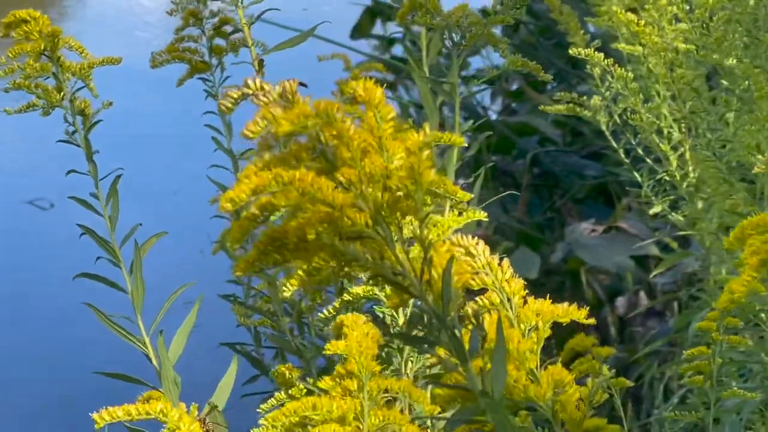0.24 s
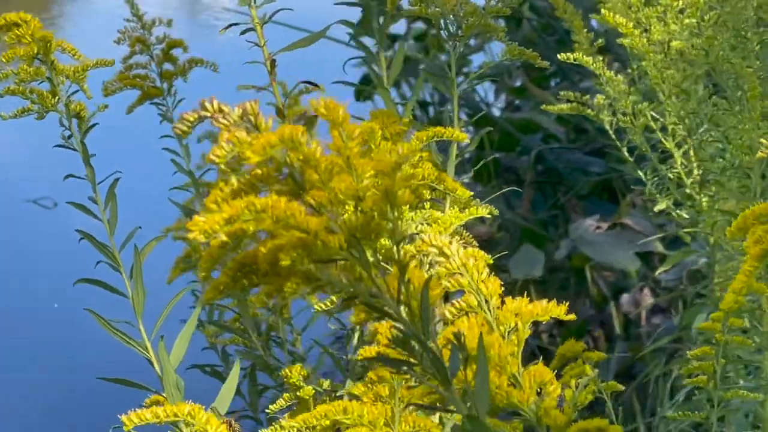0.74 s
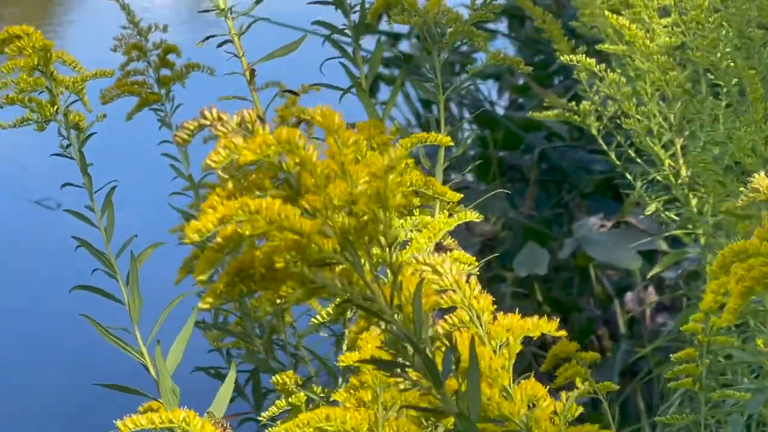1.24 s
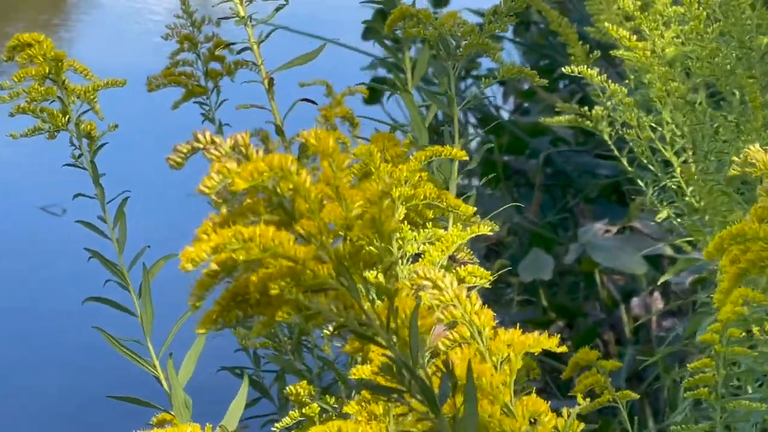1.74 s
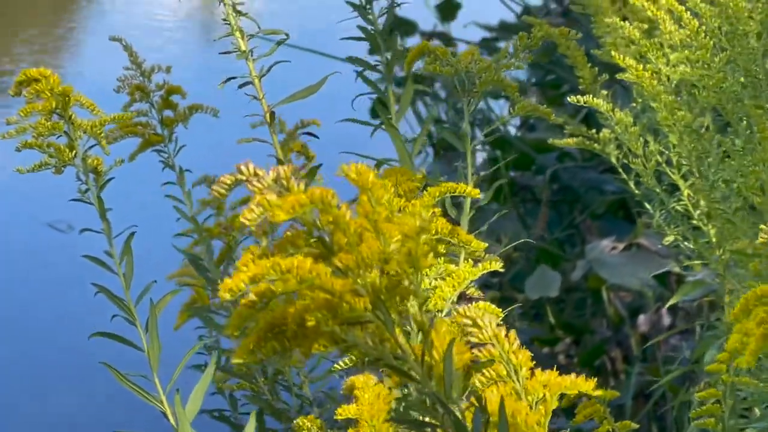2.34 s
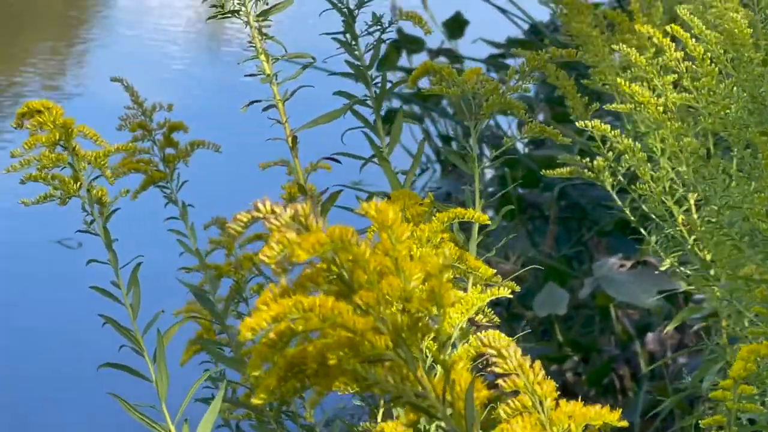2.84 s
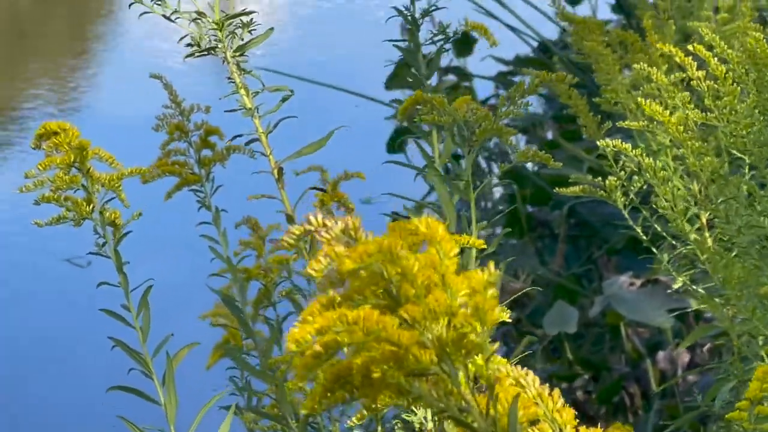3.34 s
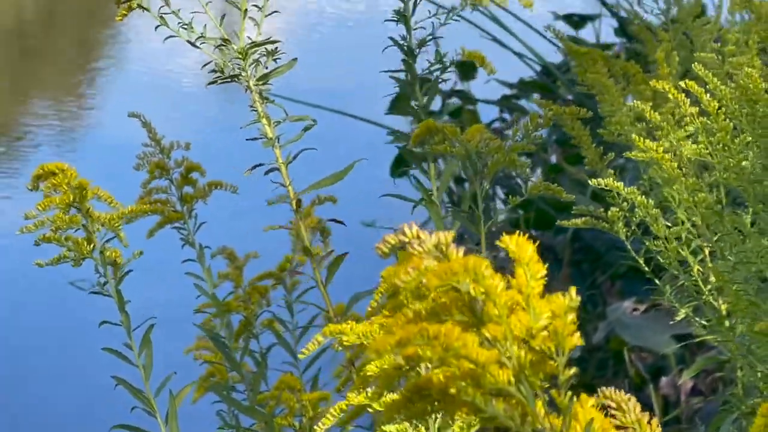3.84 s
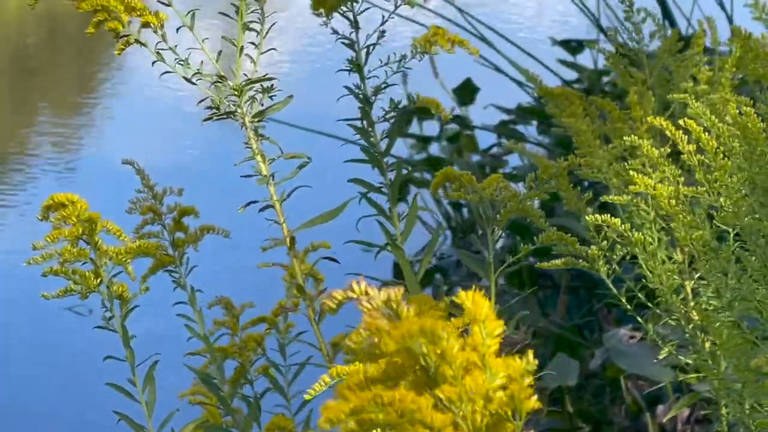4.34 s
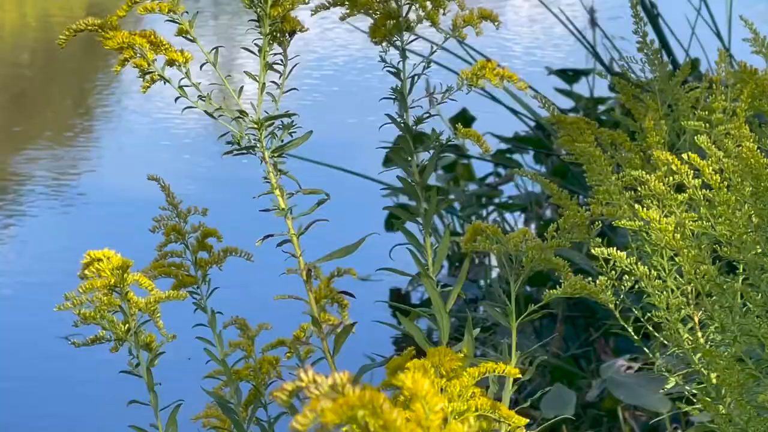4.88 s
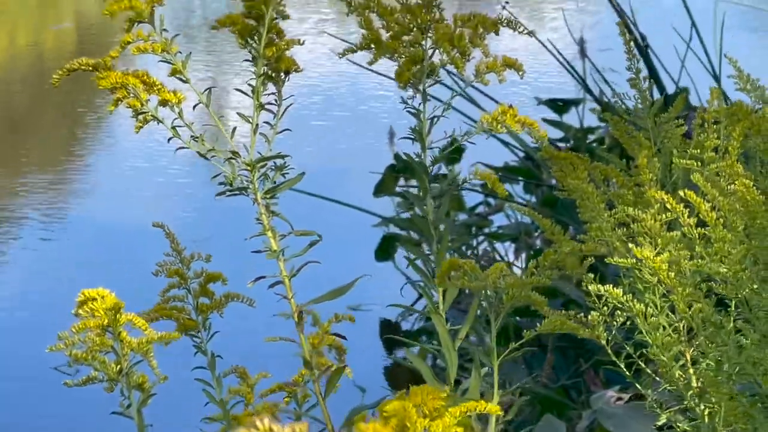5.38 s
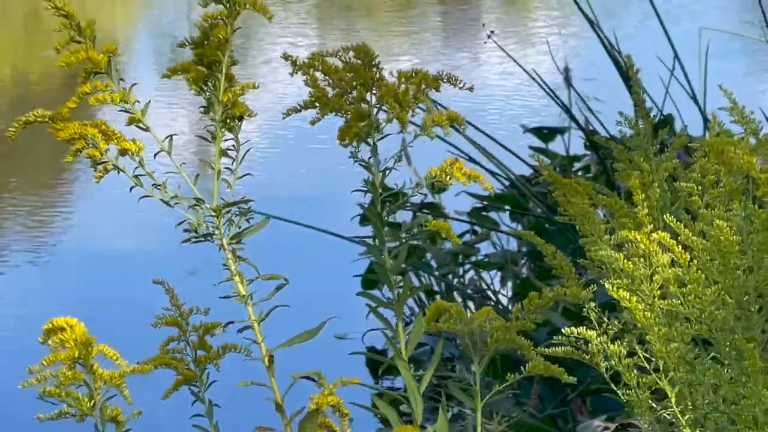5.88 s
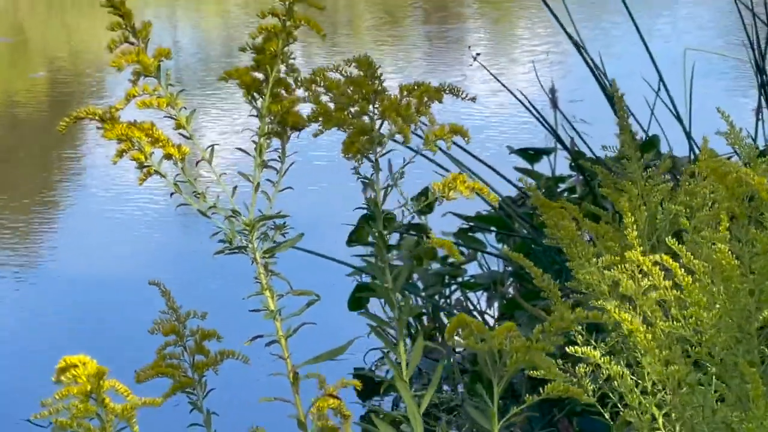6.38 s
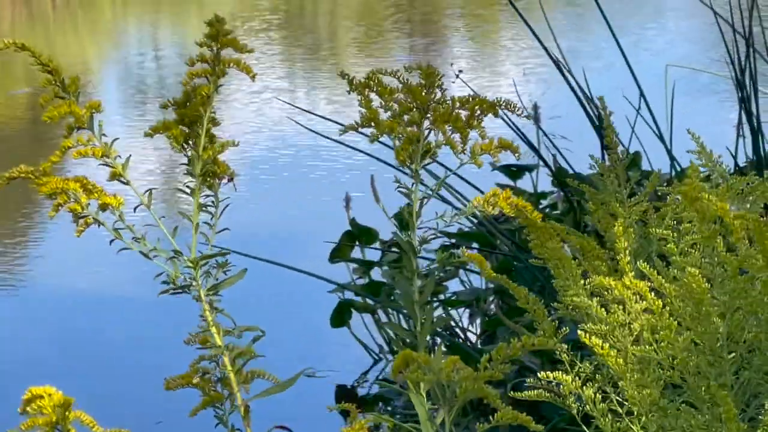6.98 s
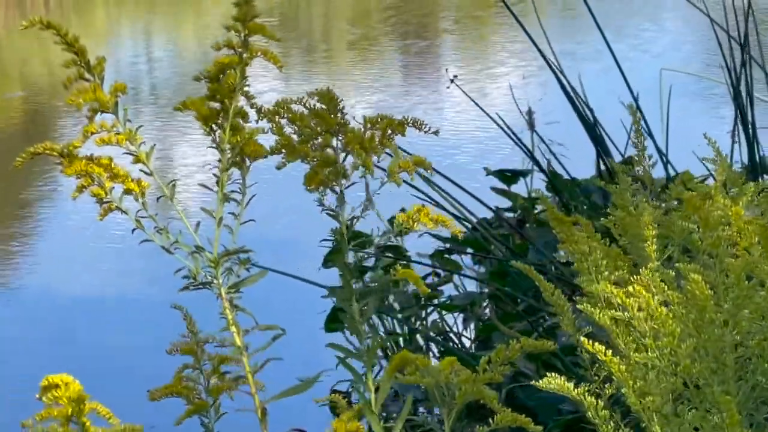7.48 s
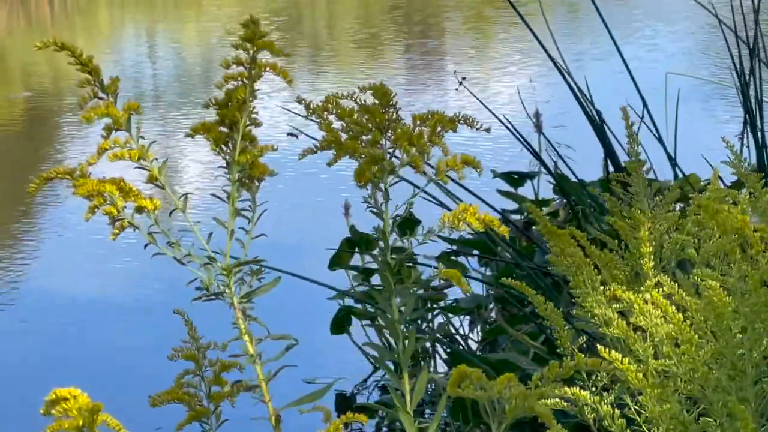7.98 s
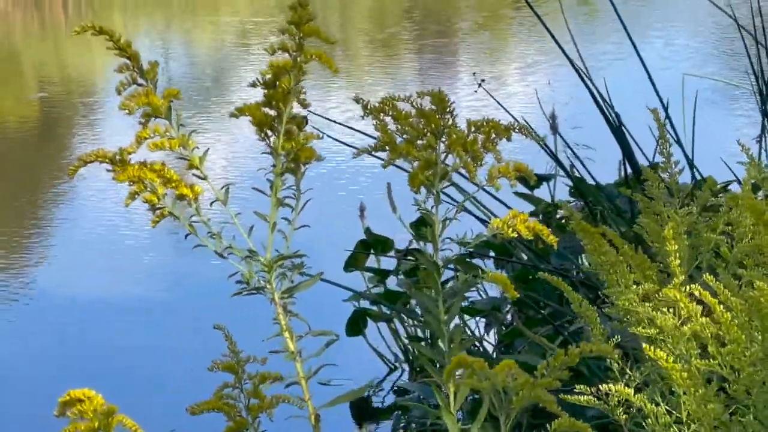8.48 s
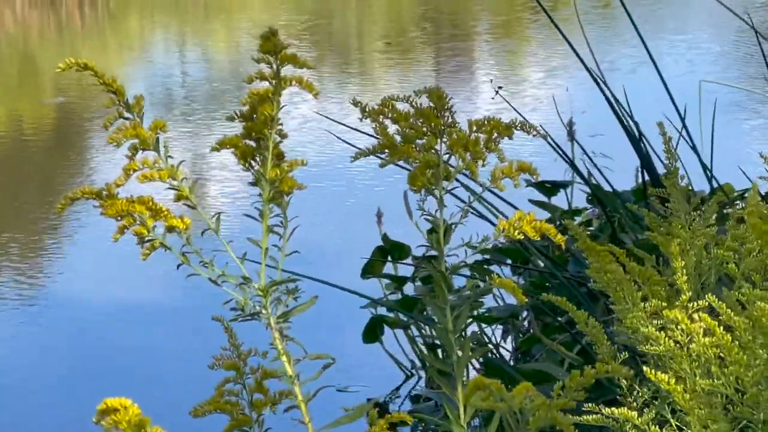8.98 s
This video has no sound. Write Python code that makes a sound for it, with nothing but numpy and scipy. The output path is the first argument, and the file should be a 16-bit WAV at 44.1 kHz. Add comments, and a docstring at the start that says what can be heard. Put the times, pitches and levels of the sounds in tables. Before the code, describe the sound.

A constant shimmering insect chorus by a pond, fast trills and fizzing katydid rasp, with low thudding wind gusts, a few tiny knocks and soft air.

```python
"""Two ground crickets trill in two gears on a weedy pond bank, over a faint distant trill and a far blur.
Two slower crickets pulse in and out of step; each cricket stroke near enough to stand out is a gliding tone.
Meadow katydids buzz in the top octave as noise that swells with each wing stroke, before a steady chorus.
Puffs of wind, made of shaped noise, buffet the microphone over a soft outdoor hush, with a few small
knocks and faint, wavering far-off tones."""
import sys
import numpy as np
from scipy import signal
from scipy.fft import rfft, irfft, next_fast_len
from scipy.io import wavfile
from scipy.ndimage import map_coordinates

SR = 44100
rng = np.random.default_rng(int(sys.argv[2]) if len(sys.argv) > 2 else 0)


def pcm_store(signal):
    """Save signal as 16-bit PCM."""
    levels = np.round(np.clip(np.atleast_2d(signal), -1, 1) * 32767)
    wavfile.write(sys.argv[1], SR, levels.astype(np.int16).T)


N = 406602

# Eddies that strike the microphone. Each row: start in seconds, thud peak in dB, flutter peak in dB.
EDDY_STRIKES = [(.862, -39, -52), (1.182, -43.5, -51), (1.354, -34.5, -44), (1.54, -35, -55),
                (1.633, -39.5, -52), (1.718, -35, -35.5), (1.89, -31, -45), (1.922, -34, -43.5),
                (2.039, -37, -42.5), (2.082, -43, -34.5), (2.104, -32, -28), (2.181, -33, -54),
                (2.211, -37, -36.5), (2.262, -31.5, -34.5), (2.334, -31.5, -40), (2.388, -35.5, -36),
                (2.419, -39, -42), (2.47, -43, -49), (2.512, -38, -38), (2.534, -43, -33),
                (2.555, -37, -32), (2.674, -38, -41), (2.73, -46, -52), (2.856, -35, -30),
                (2.891, -27, -43), (2.952, -39, -50), (3.053, -28, -31.5), (3.078, -39, -47),
                (3.631, -41, -55.5), (6.067, -44, -62), (8.152, -35, -59), (8.404, -34, -58)]


def amp(db):
    """Decibels to gain."""
    return 10 ** (np.asarray(db) / 20)


def unit(x):
    """Scale to rms 1."""
    return x / np.sqrt(np.mean(x ** 2) + 1e-20)


def along(points, hz):
    """Read (Hz, value) points on a log frequency axis."""
    f, v = np.transpose(points)
    return np.interp(np.log(hz + 1), np.log(f + 1), v)


def colour(points, hz):
    """Gain of a (Hz, dB) spectrum that falls away steeply beyond its ends."""
    below = (hz + 1) / points[0][0]
    above = points[-1][0] / (hz + 1)
    outside = np.minimum(1, np.minimum(below, above))
    return amp(along(points, hz)) * outside ** 4


def curves(rows):
    """One value per sample for each column after the time in seconds."""
    s, *columns = np.transpose(rows)
    return [np.interp(np.arange(N) / SR, s, column) for column in columns]


def wobble(rate):
    """A smooth random curve, rate knots a second."""
    knots = rng.standard_normal(int(N * rate / SR) + 4)
    return map_coordinates(knots, [np.arange(N) * rate / SR])


def filtered(x, response):
    """Filter x with a zero-phase response of frequency."""
    m = next_fast_len(N + SR // 4)
    hz = np.fft.rfftfreq(m, 1 / SR)
    return irfft(rfft(x, m) * response(hz), m)[..., :N]


def causal(points, size=4096):
    """Minimum-phase impulse response of a (Hz, dB) spectrum, made by folding its cepstrum."""
    hz = np.fft.rfftfreq(size, 1 / SR)
    cepstrum = irfft(np.log(colour(points, hz) + 1e-4))
    cepstrum[1:size // 2] *= 2
    cepstrum[size // 2 + 1:] = 0
    return irfft(np.exp(rfft(cepstrum)))


def rush(spectrum, side_points):
    """Stereo noise whose mid has rms 1, its width set by (Hz, side against mid in dB) points."""
    def mid_side_gain(hz):
        side_gain = amp(along(side_points, hz))
        return colour(spectrum, hz) * np.array([np.ones_like(hz), side_gain])

    mid, side = filtered(rng.standard_normal((2, N)), mid_side_gain)
    return np.array([mid + side, mid - side]) / np.std(mid)


def ground_crickets():
    """Two trills, each shifting gear in its own time, over a thin distant trill and a far blur."""
    # One wing stroke, gliding down as the scraper runs along the file.
    # Each row: age in milliseconds, pitch in Hz, relative level in dB.
    near_stroke = [(0, 5580, -26), (1.5, 5420, -8.5), (3.2, 5265, -2.5), (5.4, 5185, 0), (7.1, 5090, -2.5),
                   (8.6, 4860, -8.3), (10.6, 4580, -10), (12.4, 4420, -30)]
    neighbour_stroke = [(0, 5830, -25), (2, 5720, -2), (4.5, 5590, 0), (7, 5400, -5), (9.5, 5180, -2),
                        (11.5, 5030, -8), (13.5, 4750, -24)]
    # Gear changes. Each row: time in seconds, wing strokes a second.
    near_gears = [(0, 51.6), (.8, 51.2), (.95, 65), (2, 64.6), (3.18, 63.8), (3.35, 52), (4.92, 51),
                  (5.05, 64.9), (7.65, 64.5), (7.9, 51.5), (9.22, 50.5)]
    neighbour_gears = [(0, 60), (.62, 60.3), (.8, 71), (1.4, 73), (3.08, 71), (3.3, 59.7), (6.2, 59.3),
                       (6.4, 72), (7.2, 73), (7.85, 71.5), (8.05, 59.5)]
    # Spells in which a singer skimps a stroke again and again.
    # Each row: first time in seconds, last time in seconds, spacing in seconds, drop in dB.
    near_skips = [(.91, 3.18, .0869, 12), (3.27, 3.55, .13, 15), (3.79, 3.8, .13, 16),
                  (4.95, 6.73, .0885, 9), (6.82, 7.4, .138, 4), (7.58, 7.92, .11, 4), (8.13, 8.14, .11, 9)]
    neighbour_skips = [(.8, 3.1, .083, 10), (6.4, 7.9, .083, 10)]
    # Loudness of each singer. Each row: time in seconds, level in dB.
    near_level = [(0, -63.2), (.7, -63.8), (1.05, -65.3), (2, -61.3), (2.7, -59.3), (3.4, -59.2),
                  (4, -61.6), (4.85, -62.8), (5.05, -67.3), (5.7, -65.5), (6.2, -62.8), (7, -60.5),
                  (7.5, -61.1), (8.6, -64.7), (9.22, -64.7)]
    neighbour_level = [(0, -66.5), (1, -66), (2, -64.5), (3, -64), (4, -66.5), (6.2, -69.5), (7.4, -67.8),
                       (8.2, -69)]
    far_level = [(0, -67), (2.1, -70), (3, -77), (9.22, -79)]
    # Spectrum of the far blur. Each row: frequency in Hz, relative density in dB per Hz.
    blur_spectrum = [(4330, -22), (4540, 0), (5060, -1), (5300, -.5), (5600, 1.5), (5830, -1), (5960, 1.5),
                     (6450, 0), (6660, 5), (6850, 1.5), (7350, 2.5), (7700, -5), (8500, -28)]
    far_hz = 5128
    blur_db, blur_flicker_db = -68.1, 1.2

    near = trill(near_stroke, near_gears, near_skips, wet_db=-16, port_phase=.5)
    neighbour = trill(neighbour_stroke, neighbour_gears, neighbour_skips, wet_db=-13, port_phase=1.1)

    # One distant cricket whose strokes merge into a thin, unsteady line.
    far_phase = 2 * np.pi * np.cumsum(far_hz + 15 * wobble(90)) / SR
    far = unit(amp(2.5 * wobble(60)) * np.sin(far_phase))

    # Many far crickets merge into a flickering blur.
    blur_side = [(4400, -14), (5200, -5), (5700, 1), (6200, -2), (6800, -11)]
    blur = amp(blur_db + blur_flicker_db * wobble(110)) * rush(blur_spectrum, blur_side)

    song = amp(curves(near_level)[0]) * near + amp(curves(neighbour_level)[0]) * neighbour
    return song + amp(curves(far_level)[0]) * far + blur


def trill(stroke, gears, skips, wet_db, port_phase):
    """The fast gear beats quicker and sharper; skimped strokes break the trill into short bursts."""
    slow_gear_flat = .003  # share by which the pitch drops in the slow gear
    rate, = curves(gears)
    fast = (rate - rate.min()) / np.ptp(rate)  # 0 at the slowest beat, 1 at the fastest
    starts = beats(rate * (1 + .012 * wobble(40)))
    middles = starts + .5 / rate.mean()
    stroke_db = np.zeros(len(starts))
    for first, last, spacing, drop_db in skips:
        for s in np.arange(first, last, spacing):
            nearest = np.argmin(np.abs(middles - s))
            stroke_db[nearest] = -drop_db
    tuning = 1 - slow_gear_flat * (1 - fast)
    return stridulate(stroke, starts, vary_db=.6, detune=.004, wet_db=wet_db,
                      port_phase=port_phase, tuning=tuning, stroke_db=stroke_db)


def slow_crickets():
    """Two pulsers deep in the weeds, at slightly different rates, drift in and out of step."""
    # One wing stroke of each singer. Each row: age in milliseconds, pitch in Hz, relative level in dB.
    low_stroke = [(0, 6080, -26), (3, 6120, -5), (8, 6140, -2), (13, 6200, -1), (17, 6160, 0),
                  (21, 6080, -3.5), (26, 5945, -7), (30, 5900, -28)]
    high_stroke = [(0, 6345, -25), (5, 6360, -6), (14, 6360, 0), (22, 6345, -3), (27, 6300, -9),
                   (33, 6240, -26)]
    # The high singer's pace. Each row: time in seconds, chirps a second.
    high_rate = [(0, 11.814), (6.2, 11.814), (9.22, 11.64)]
    # Loudness. Each row: time in seconds, low singer in dB, high singer in dB.
    levels = [(0, -66, -68.7), (3, -65.6, -68.5), (4, -67.5, -72.5), (5, -67.4, -70.5), (7, -66.7, -69.5),
              (8, -67.2, -70.6), (9.22, -69.3, -73)]

    low_starts = np.arange(.053, N / SR, 1 / 11.205)  # 11.205 chirps a second
    high_starts = .05 + np.append(0, beats(curves(high_rate)[0]))
    low = stridulate(low_stroke, low_starts, vary_db=.8, detune=.002,
                     wet_db=-12, port_phase=1.2, rough=.22)
    high = stridulate(high_stroke, high_starts, vary_db=1, detune=.0015,
                      wet_db=-11, port_phase=1.0, rough=.2)
    low_db, high_db = curves(levels)
    return amp(low_db) * low + amp(high_db) * high


def beats(rate):
    """Times at which a wing beating at this rate starts a stroke."""
    turns = np.cumsum(rate) / SR
    return np.flatnonzero(np.diff(np.floor(turns))) / SR


def stridulate(stroke, starts, vary_db, detune, wet_db, port_phase, rough=.07, tuning=1, stroke_db=0):
    """Each wing stroke is one gliding, scratchy tone, reaching the two ports out of phase."""
    scratch_per_s = 300  # pace at which uneven file teeth roughen a stroke
    sway_rad, sway_per_s = 2.5, 6  # swaying stems keep turning the phase of the scattered song
    ms, pitch, level = np.transpose(stroke)
    now = np.arange(N) / SR
    index = np.maximum(np.searchsorted(starts, now) - 1, 0)
    age_ms = (now - starts[index]) * 1000

    # Every stroke differs a little in loudness, tuning and the phase at which the file catches.
    size, tune, catch = rng.standard_normal((len(starts), 3)).T
    hz = np.interp(age_ms, ms, pitch) * (tuning + detune * tune[index])
    phase = 2 * np.pi * np.cumsum(hz) / SR
    phase = phase + 0.53 * catch[index] + rough * wobble(scratch_per_s)

    swell_db = np.interp(age_ms, ms, level, left=-120, right=-120)
    swell = amp(swell_db + (vary_db * size + stroke_db)[index])
    swell = unit(swell * np.exp(rough * wobble(scratch_per_s))) * np.sqrt(2)  # the tone gets rms near 1

    direct = swell * np.sin([phase + port_phase / 2, phase - port_phase / 2])
    swaying = swell * np.sin(phase + sway_rad * wobble(sway_per_s))
    return direct + amp(wet_db) * scatter(swaying)


def scatter(x):
    """A short diffuse tail from stems and leaves, different in each ear: noise decaying by band."""
    # Scatter in the weeds. Each row: frequency in Hz, time to fall by 60 dB in seconds.
    weed_decay = [(1000, 0.026), (6000, 0.19), (15000, 0.0049)]
    hz, t, z = signal.stft(rng.standard_normal((2, SR // 4)), SR, nperseg=256)
    decay = amp(-60 * t / along(weed_decay, hz)[:, None])
    tail = signal.istft(z * decay, SR, nperseg=256)[1]
    tail = tail / np.linalg.norm(tail[0])
    return signal.oaconvolve(x[None], tail, axes=1)[:, :N]


def katydids():
    """Two singers with wavering wing beats stand out of a distant chorus of steady rasping noise."""
    # Loudness. Each row: time in seconds, level in dB.
    near_level = [(0, -56), (2, -53), (3.8, -54), (4.85, -62), (5.05, -49), (6.2, -49), (8.1, -51),
                  (8.3, -66), (9.22, -66)]
    next_level = [(0, -66), (5.3, -55), (5.7, -51.5), (9.22, -51.5)]
    chorus_level = [(0, -45), (1.5, -47), (2.7, -47.5), (3.7, -48.5), (4.4, -47.5), (5.2, -44.5),
                    (6.5, -46), (8, -46.5), (8.5, -45.5), (9.22, -46.5)]
    # Wing beat before its waver. Each row: time in seconds, wing strokes a second.
    near_beat = [(0, 44), (5, 43.6), (7.4, 42.6), (8.2, 41.3)]
    next_beat = [(5.6, 38.5), (7.3, 37.2), (9.22, 38)]
    # Rasp spectra. Each row: frequency in Hz, relative density in dB per Hz.
    near_rasp = [(8000, -36), (10500, -20), (11500, -17), (12600, -12), (13300, -5.5), (13800, -.5),
                 (14700, 0), (15200, -1.5), (15900, -3)]
    next_rasp = [(8000, -36), (10500, -23), (12600, -17), (13300, -9), (13800, -4), (14700, -1.5),
                 (15300, -1), (15700, 2), (15900, 2)]
    chorus_rasp = [(6500, -45), (7500, -25), (8200, -25), (8800, -38), (9400, -25), (10200, -16),
                   (11000, -11.5), (12600, -9.5), (13300, -6), (13800, -1.5), (14700, 0), (15200, -1),
                   (15900, 0)]
    # Width of the chorus. Each row: frequency in Hz, side against mid in dB.
    chorus_side = [(6500, -5), (7500, 5), (8200, 11.5), (8800, 26), (9400, 13.5), (10200, 4.5), (11000, 0),
                   (12400, -8), (13300, -25), (16000, -30)]

    near_rate = curves(near_beat)[0] + .15 * wobble(4)
    next_rate = curves(next_beat)[0] + .3 * wobble(4)
    near = amp(curves(near_level)[0]) * katydid(near_rasp, near_rate, depth_db=8)
    other = amp(curves(next_level)[0]) * katydid(next_rasp, next_rate, depth_db=7.5)
    chorus_db = curves(chorus_level)[0] + .6 * wobble(80)
    return near + other + amp(chorus_db) * rush(chorus_rasp, chorus_side)


def katydid(rasp, rate, depth_db):
    """A broad rasp from the file teeth, swelling once for each wing stroke."""
    turn = 2 * np.pi * np.cumsum(rate) / SR
    stroke_shape = np.cos(turn) + 0.1 * np.cos(2 * turn)
    strokes = amp(depth_db * stroke_shape + 1.3 * wobble(60))
    return unit(strokes) * rush(rasp, [(10000, 8), (11000, 2), (12400, -12), (13300, -60)])


def wind():
    """A lumpy breeze rumbles on the microphone; gusts swell it, churn and shed thudding, fluttering eddies."""
    # The breeze between gusts. Each row: time in seconds, rumble in dB before the lift and lumps below.
    lulls = [(0.0, -58), (0.51, -53.5), (1.26, -58), (1.49, -52.5), (1.85, -59.5), (2.13, -43), (2.52, -50),
             (2.72, -49), (3.34, -60), (5.13, -56.5), (5.5, -52), (6.16, -52), (7.06, -54), (7.29, -51),
             (7.68, -50.5), (8.48, -41.5), (8.7, -55.5), (9.22, -57.5)]
    # Gusts on the microphone. Each row: start in seconds, length in seconds, rumble in dB, churn in dB.
    gusts = [(0.835, 0.11, -48, -56.5), (1.151, 0.025, -52, -53), (1.335, 0.036, -45.5, -47.5),
             (1.54, .11, -48, -52.5), (1.699, 0.04, -46, -55), (1.875, 0.092, -44, -50),
             (2.067, 0.059, -41, -43.5), (2.174, 0.041, -50, -48.5), (2.248, 0.15, -44, -45.5),
             (2.428, 0.19, -37.5, -47), (2.623, 0.14, -45, -50.5), (2.844, 0.044, -40, -36.5),
             (3.036, 0.064, -40.5, -53), (3.244, 0.049, -47.5, -59), (3.825, 0.025, -51, -59),
             (6.04, 0.057, -38, -56), (8.138, 0.023, -30.5, -65), (8.374, 0.081, -35, -52),
             (8.51, 0.097, -36, -68)]
    # Spectra of rumble, steady churn inside a gust, eddy thud and eddy flutter.
    # Each row: frequency in Hz, relative density in dB per Hz.
    rumble_spectrum = [(20, -40), (35, -8), (52, 0.5), (70, 3.5), (100, -1), (150, -11), (250, -30.5),
                       (500, -42)]
    churn_spectrum = [(60, -4), (110, 1), (200, 1.5), (350, -10.5), (550, -22.5), (800, -35)]
    thud_spectrum = [(30, -16.5), (55, -16.5), (90, 5), (150, -2.5), (240, -6), (350, -18), (600, -44.5)]
    flutter_spectrum = [(150, -9.5), (260, -2), (350, 2.5), (520, -6), (680, -17), (900, -44)]
    breeze_lift_db, lumps_db, lumps_per_s = 2, 2, 13
    thud_rise_s, flutter_rise_s, eddy_side_db = 0.0065, 0.0053, -14.5

    *_, rumble_db, churn_db = np.transpose(gusts)
    swells = np.array([gust_swell(start, length) for start, length, *_ in gusts])
    breeze = amp(curves(lulls)[0] + breeze_lift_db + lumps_db * wobble(lumps_per_s))
    rumble_level = np.hypot(breeze, amp(rumble_db) @ swells)
    rumble = rumble_level * rush(rumble_spectrum, [(60, -10.5)])
    churn = amp(churn_db) @ swells * rush(churn_spectrum, [(60, -10.0)])

    def strikes():
        _, thud_db, flutter_db = np.transpose(EDDY_STRIKES)
        thuds = eddies(thud_spectrum, thud_db, thud_rise_s)
        return thuds + eddies(flutter_spectrum, flutter_db, flutter_rise_s)

    mid, side = strikes(), strikes()
    return rumble + churn + mid + amp(eddy_side_db) * np.array([side, -side])


def gust_swell(start, length):
    """A gust rises quickly, holds and dies away."""
    attack_s, release_s = 0.012, 0.026
    age = np.arange(N) / SR - start
    return np.clip(age / attack_s, 0, 1) * np.exp(-np.maximum(age - length, 0) / release_s)


def eddies(spectrum, peaks_db, rise, size=4096):
    """Each eddy is one short swell of turbulence on the microphone; the bass trails it."""
    out = np.zeros(N + SR)
    u = np.arange(size) / SR / rise  # age in rise times; the swell peaks at 1
    swell = u ** 2 * np.exp(-2 * u)
    body = causal(spectrum)
    noises = rng.standard_normal((len(EDDY_STRIKES), size))
    for (s, *_), db, noise in zip(EDDY_STRIKES, peaks_db, noises):
        puff = signal.fftconvolve(noise * swell, body)[:size]
        out[round(s * SR):][:size] += amp(db) * puff / np.abs(puff).max()
    return out[:N]


def taps():
    """Small dry knocks: a decaying burst of noise through a broad resonance."""
    # Light handling taps. Each row: time in seconds, peak in dB, resonance in Hz.
    knocks = [(3.894, -49, 279.5), (3.996, -42, 396), (4.315, -52, 515), (4.689, -47, 168),
              (4.868, -49.5, 274), (6.255, -47.5, 279), (7.801, -56.5, 3045)]
    out = np.zeros(N + SR)
    t = np.arange(SR // 10) / SR
    for s, db, hz in knocks:
        contact = rng.standard_normal(len(t)) * amp(-60 * t / 0.048)  # falls 60 dB in 48 ms
        resonance = causal([(hz / 2, -9), (hz, 0), (hz * 1.65, -12)])
        knock = signal.fftconvolve(contact, resonance)
        out[round(s * SR):][:len(knock)] += amp(db) * knock / np.abs(knock).max()
    return out[:N]


def squeals():
    """Faint, rough tones from far away, wavering as they swell and fade."""
    # Thin far-off tones, before their waver.
    # Each row: start in seconds, end in seconds, first pitch in Hz, last pitch in Hz, level in dB.
    tones = [(.52, 1.14, 3060, 2855, -68.5), (1.2, 1.9, 2745, 2765, -70.5), (1.3, 1.8, 1785, 1775, -69.5),
             (1.62, 2.12, 1805, 1790, -67), (1.98, 2.52, 1780, 1790, -67.5),
             (2.35, 3.15, 1780, 1810, -72.5), (1.5, 2.05, 2400, 2520, -71), (2.5, 3.0, 2720, 2820, -71.5),
             (3.1, 4.1, 485, 479, -71), (3.7, 3.9, 2130, 2080, -77), (3.92, 4.12, 1830, 1850, -75)]
    out = np.zeros(N)
    now = np.arange(N) / SR
    for start, end, first_hz, last_hz, db in tones:
        glide = np.interp(now, [start, end], [first_hz, last_hz])
        pitch = glide + 13 * wobble(140) + 7 * wobble(16)
        swell = np.sin(np.pi * np.clip((now - start) / (end - start), 0, 1))
        tone = np.sin(2 * np.pi * np.cumsum(pitch) / SR)
        out += amp(db + 2.2 * wobble(50)) * swell * tone
    return out


def air():
    """Shaped noise makes the open-air hush, and a soft hiss that fades after the first seconds."""
    # Loudness. Each row: time in seconds, hush in dB, soft hiss in dB.
    levels = [(0, -63, -63.5), (1.2, -60.5, -65.5), (1.6, -61, -62.5), (2.9, -62, -63), (3.25, -61, -67.5),
              (4, -61, -74.5), (5, -61, -80), (7.5, -61.5, -80), (9.22, -62, -78.5)]
    # Spectra. Each row: frequency in Hz, relative density in dB per Hz.
    hush_spectrum = [(90, 4), (160, 1), (250, -0.5), (400, -6.5), (650, -6.5), (1000, -7.5), (1400, -12.5),
                     (2000, -20.5), (3000, -31.5), (4500, -27.5)]
    hiss_spectrum = [(700, 4.5), (1200, 4), (1800, 2.5), (2200, 3.5), (2900, 4), (3500, 0), (4300, -2),
                     (7200, -6.5), (8500, -45)]
    # Width of the hush. Each row: frequency in Hz, side against mid in dB.
    hush_side = [(200, -8), (500, -3.5), (1100, -2), (1600, -6), (2200, -73)]
    hush_db, hiss_db = curves(levels)
    hush = amp(hush_db + 0.19 * wobble(5)) * rush(hush_spectrum, hush_side)
    hiss = amp(hiss_db + 1.2 * wobble(8.6)) * rush(hiss_spectrum, [(1000, -9.0), (2200, -42.0)])
    return hush + hiss


def scene():
    """Insects, wind, small noises and air together."""
    insects = ground_crickets() + slow_crickets() + katydids()
    return insects + wind() + taps() + squeals() + air()


def record(dry):
    """The recorder keeps nothing above its band limit."""
    top_hz = 15760
    return filtered(dry, lambda hz: hz < top_hz)


dry = scene()
out = record(dry)
pcm_store(out)
```